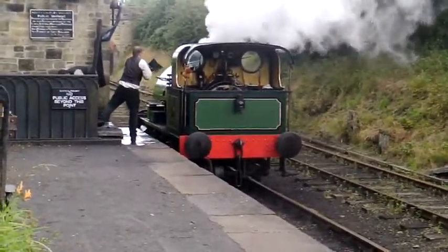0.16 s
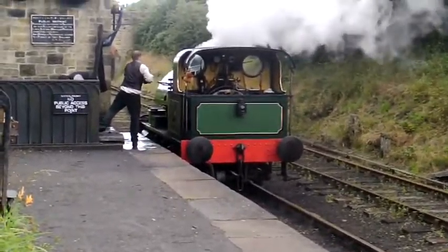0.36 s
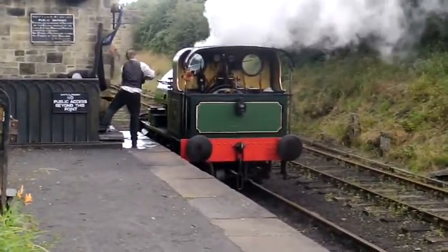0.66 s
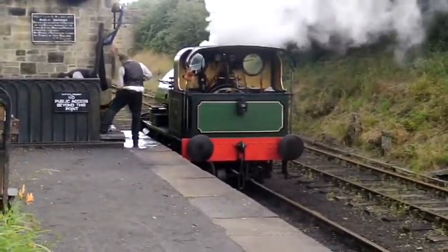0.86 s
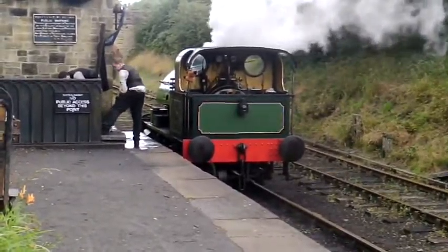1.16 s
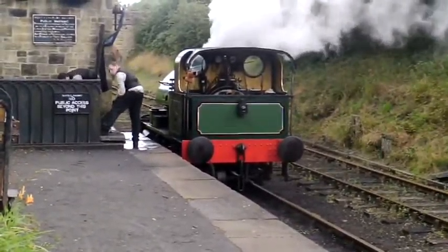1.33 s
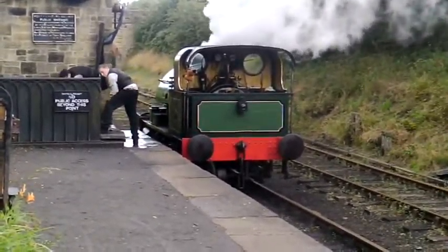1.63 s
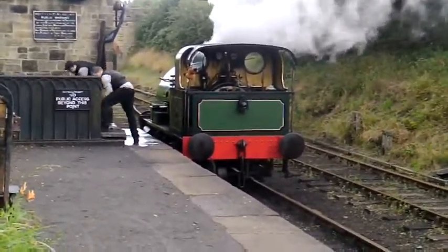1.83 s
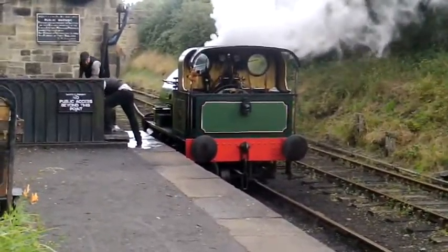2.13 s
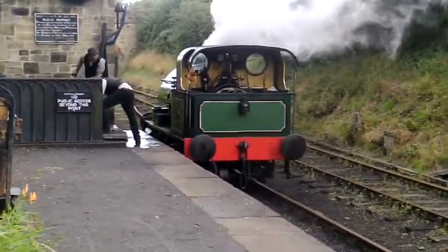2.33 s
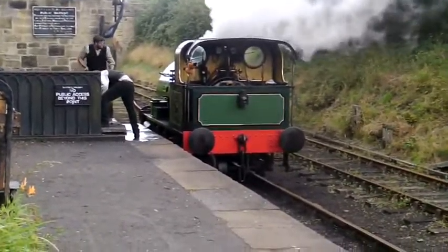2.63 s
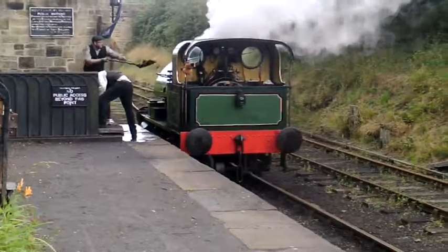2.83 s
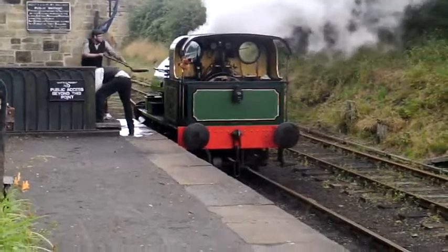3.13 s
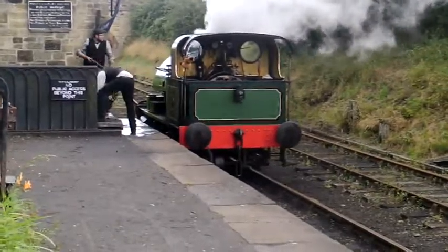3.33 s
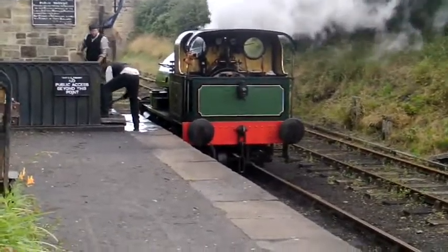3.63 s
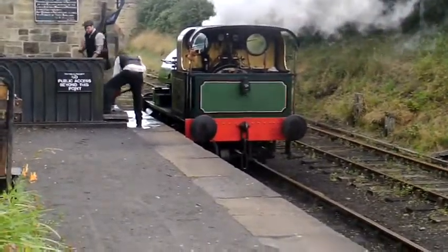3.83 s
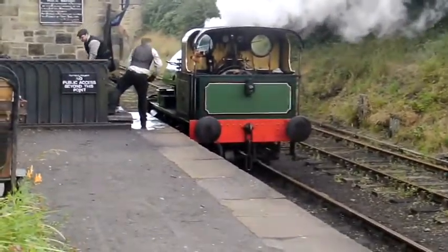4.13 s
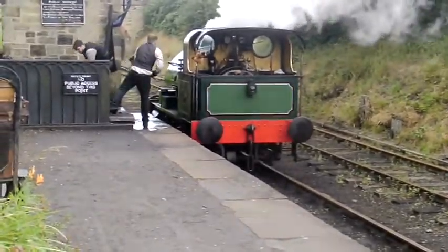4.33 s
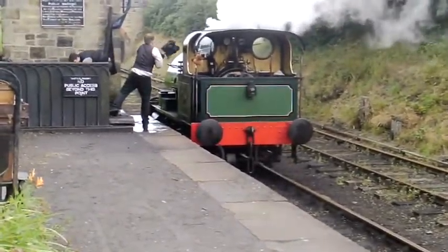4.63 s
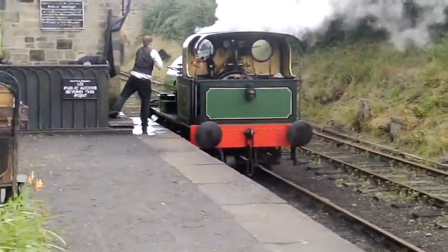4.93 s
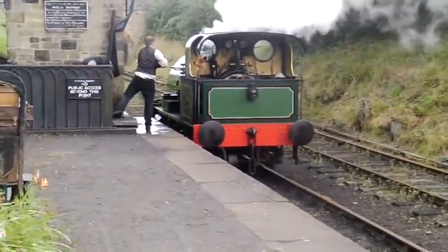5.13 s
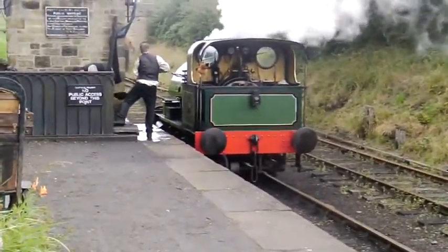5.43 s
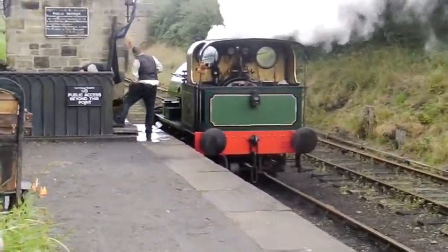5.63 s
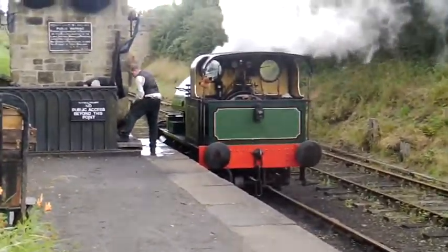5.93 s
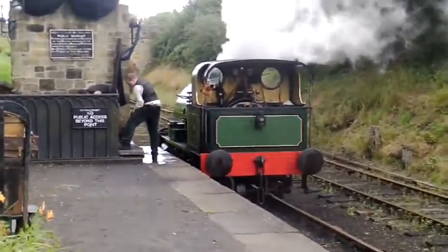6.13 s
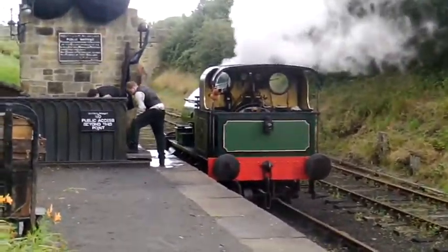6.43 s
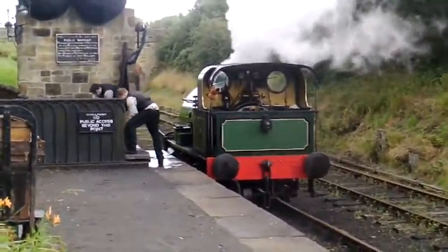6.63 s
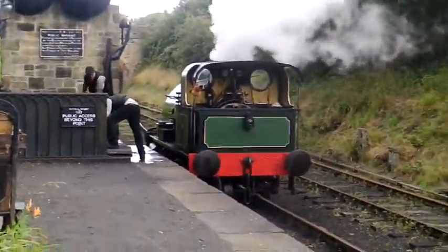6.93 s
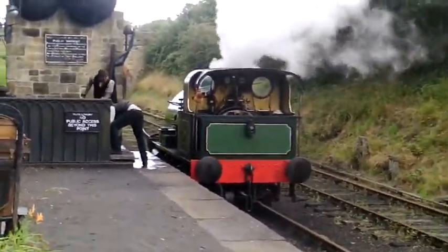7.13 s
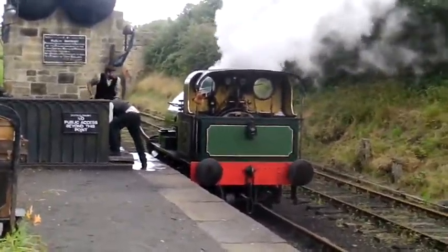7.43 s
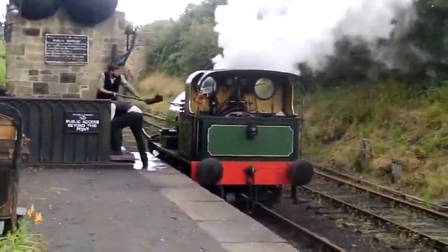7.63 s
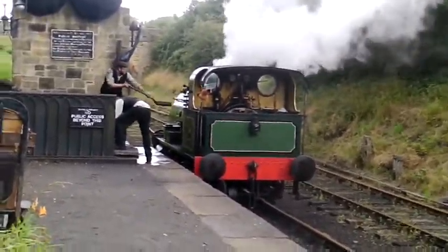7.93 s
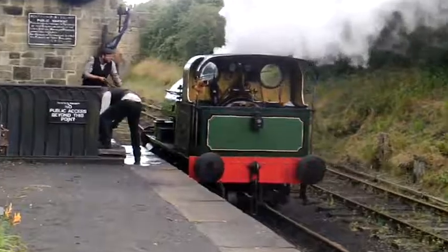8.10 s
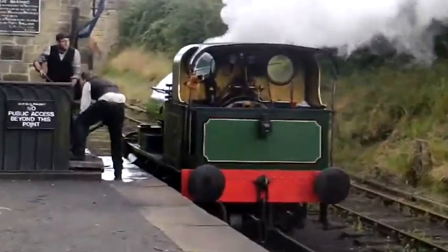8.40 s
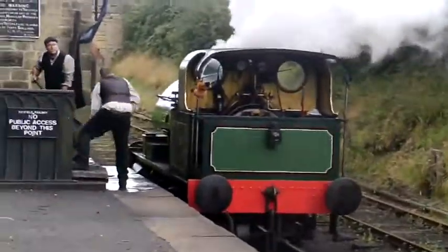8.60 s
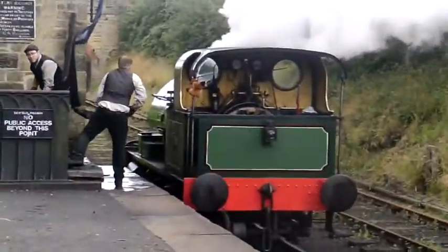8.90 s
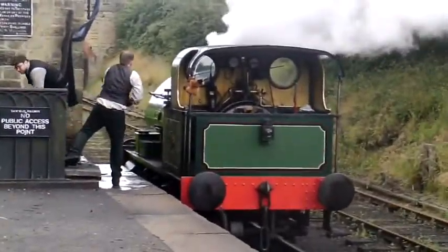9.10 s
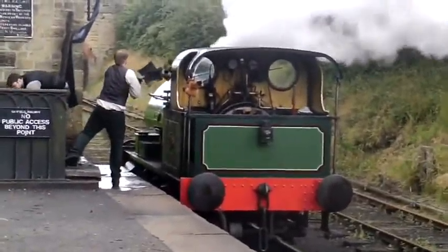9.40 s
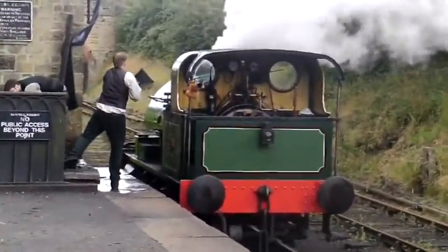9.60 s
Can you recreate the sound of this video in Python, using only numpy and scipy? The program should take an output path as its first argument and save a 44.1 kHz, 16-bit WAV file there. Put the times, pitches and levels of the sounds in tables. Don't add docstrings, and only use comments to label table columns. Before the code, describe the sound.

A loud, steady, piercing steam hiss from a standing locomotive, with wind buffets on the microphone, faint shovel squeaks and coal thuds.

```python
import sys
import numpy as np
from scipy import signal
from scipy.fft import rfft, irfft, next_fast_len
from scipy.io import wavfile
from scipy.ndimage import uniform_filter1d, map_coordinates

SR = 44100
rng = np.random.default_rng(int(sys.argv[2]) if len(sys.argv) > 2 else 0)


def pcm_store(signal):
    levels = np.round(np.clip(np.atleast_2d(signal), -1, 1) * 32767)
    wavfile.write(sys.argv[1], SR, levels.astype(np.int16).T)


def invert_db(level):
    return 10 ** (np.asarray(level, dtype=float) / 20)


N = 430416

# time_s, level_db, pitch_hz
STEAM_JET = [(0, -10.5, 8300), (.48, -11.5, 8200), (.7, -11, 8180), (1.6, -11, 8160), (1.95, -11.5, 8300),
             (3.1, -10.5, 8330), (4.0, -11.5, 8310), (4.15, -12, 8320), (4.5, -11, 8300), (5.03, -11, 8300),
             (5.14, -11.5, 8370), (6.3, -12, 8350), (7.3, -11.5, 8260), (8.4, -11.2, 8300),
             (8.51, -10.5, 8400), (9.25, -11, 8330), (9.38, -13, 8220), (9.5, -10.5, 8130)]
# frequency_hz, level_db (per Hz)
HISS_COLOUR = [(880, -58), (1500, -17), (2090, -10), (2260, -12.5), (3130, -3), (3410, -4.5), (5050, -0.5),
               (7180, -6), (8240, -5.5), (9360, -9), (12300, -18.5), (14500, -26.5), (15600, -35)]
# frequency_hz, level_db (per Hz)
ROAR_COLOUR = [(130, -50), (220, -19.5), (401, -19.5), (569, -13), (1100, -9), (1830, -6), (2270, -7),
               (2600, 1), (3380, -22), (5720, -120)]
# pitch_hz, width_hz, level_db (against the hiss)
PIPE_TONES = [(1195, 17, -60), (2152, 20, -34), (3190, 64, -23), (5050, 140, -17.5), (5620, 24, -22),
              (6400, 88, -36), (7500, 41, -22)]
# start_s, pitch_hz, level_db
PIPE_WHISTLES = [(.15, 4950, -19), (.55, 3190, -23), (.68, 3210, -30), (1.05, 7910, -21), (1.62, 4910, -24),
                 (3.06, 4515, -23), (3.18, 2140, -35), (4.88, 5610, -23), (5.43, 7890, -28),
                 (7.05, 2152, -32), (8.16, 2140, -33), (8.44, 3113, -25), (9.53, 8060, -29)]
# delay_ms, level_db
YARD_ECHOES = [(4.138, -23), (6.67, -26), (9.41, -27), (10.85, -26), (12.4, -28), (13.486, -24),
               (16.25, -30), (19.98, -30), (35.41, -31)]
# time_s, level_db
WIND_GUSTS = [(0, -43), (.6, -44), (1.3, -34), (2.2, -37), (2.7, -35), (3.4, -35.5), (4.3, -38),
              (4.75, -44), (5.4, -41), (6.55, -45), (6.95, -40), (7.3, -41), (7.55, -32), (7.85, -34.5),
              (8.1, -45), (8.96, -42), (9.13, -29), (9.76, -32.5)]
# frequency_hz, level_db (per Hz)
BUFFET_COLOUR = [(7.1, -26), (12, 3.5), (27, -0.5), (39, -0.5), (62, -8), (107, -18), (200, -32),
                 (260, -28), (440, -120)]
# centre_s, level_db
WIND_POPS = [(.919, -18), (1.13, -17), (1.165, -18), (1.669, -19), (2.411, -19), (2.72, -20), (3.368, -23),
             (7.458, -18.5), (7.601, -18), (9.017, -23), (9.069, -12), (9.124, -11), (9.154, -17),
             (9.238, -14), (9.3, -11), (9.358, -20.5), (9.475, -17), (9.537, -18), (9.688, -24),
             (9.714, -17)]
# centre_s, centre_khz
SPLIT_BANDS = [(.251, 14.6), (.46, 5.1), (.46, 6.9), (1.273, 7.0), (1.273, 9.7), (1.366, 7.5), (1.366, 9.7),
               (1.366, 15), (2.294, 14.5), (3.223, 14.8), (3.688, 8.3), (4.152, 14.5), (4.988, 15),
               (5.522, 6.6), (5.684, 15), (6.033, 9.3), (6.033, 15), (6.242, 11.1), (6.242, 13.4),
               (6.59, 11.1), (6.637, 5.7), (6.637, 9), (7.031, 4.9), (7.937, 9), (8.123, 9.7),
               (8.308, 14.5), (8.401, 10), (8.401, 15), (8.819, 14.5), (8.866, 7.9)]
# start_s, level_db, centre_hz
COAL_THUDS = [(.47, -38, 200), (2.046, -33, 650), (3.176, -40, 500), (3.346, -39, 280), (3.597, -41, 352),
              (4.168, -34, 600), (5.052, -34, 240), (5.06, -36, 89.8), (5.085, -33.5, 95), (5.15, -41, 220),
              (5.378, -43, 301), (8.159, -38.5, 141.4), (8.79, -38, 400)]
# start_s, length_s, start_pitch_hz, level_db
SHOVEL_SQUEAKS = [
    (2.3, 0.033, 1118, -28),
    (2.486, 0.047, 1195, -32),
    (6.4, 0.18, 1182, -34),
]
# start_s, length_s (negative gives silence), start_pitch_hz, level_db
BIRD_CHIRP = (2.5, -0.95, 3850, -20.5)

ROAR_DB, ROAR_SWAY_DB = -15.5, .55
SCREECH_DB, SCREECH_HZ, SCREECH_DB_PER_KHZ = -9.5, 8205, 0
WHISTLE_S, WHISTLE_DRIFT = 0.2, 0.0064
FLAP_DB, FLAP_GROWS, CALM_DB = -46, 0.1, -39.5
POP_MS, POP_SPREAD = 5.2, .18
SPLIT_SAMPLES, SPLIT_WIDE_KHZ = 2048, 1.6
THUD_S, THUD_CYCLES = 0.042, 4.5
SQUEAK_SAG_HZ_PER_S, SQUEAK_EDGE = -220, 0.36
CHIRP_RISE_HZ_PER_S, CHIRP_LATE = 2600, 1.9


def unit(x):
    return x / np.sqrt(np.mean(x ** 2) + 1e-20)


def along(points, hz):
    f, v = np.transpose(points)
    return np.interp(np.log(hz + 1), np.log(f + 1), v)


def curves(rows):
    s, *columns = np.transpose(rows)
    return [np.interp(np.arange(N) / SR, s, column) for column in columns]


def wobble(rate):
    coarse = np.arange(0, N + 64, 64)
    values = map_coordinates(rng.standard_normal(N // 100), [coarse * rate / SR])
    return np.interp(np.arange(N), coarse, values)


def filtered(x, response):
    m = next_fast_len(len(x) + 8192)
    spectrum = rfft(x, m) * response(np.fft.rfftfreq(m, 1 / SR))
    return irfft(spectrum, m)[:len(x)]


def coloured(noise, spectrum):
    return unit(filtered(noise, lambda hz: invert_db(along(spectrum, hz))))


def rush(spectrum, patchy_db):
    z = signal.stft(rng.standard_normal(N), nperseg=4096)[2]

    def smooth(bins, frames):
        across_pitch = uniform_filter1d(rng.standard_normal(z.shape), bins, 0)
        return unit(uniform_filter1d(across_pitch, frames, 1))

    patches = 0.73 * smooth(bins=16, frames=5)
    streaks = 1.5 * smooth(bins=3, frames=24)
    noise = signal.istft(z * invert_db(patchy_db * (patches + streaks)), nperseg=4096)[1][:N]
    return coloured(noise, spectrum)


def fuzzy(hz, width_hz):
    knots = np.arange(0, N + 8, 8)
    hold = np.exp(-2 * np.pi * width_hz * knots[1] / SR)
    slow = signal.lfilter([1], [1, -2 * hold, hold ** 2], rng.standard_normal((2, len(knots))))
    sine_part, cosine_part = [np.interp(np.arange(N), knots, v) for v in slow]
    phase = 2 * np.pi * np.cumsum(hz) / SR
    return unit(sine_part * np.sin(phase) + cosine_part * np.cos(phase))


def note(s, length, hz, db, hz_per_s, edge, late):
    t = np.clip(np.arange(N) / SR - s, 0, length)
    arch = np.abs(np.sin(np.pi * (t / length) ** late)) ** edge * (t < length)
    return invert_db(db + 1.5) * arch * np.sin(2 * np.pi * (hz * t + hz_per_s * t ** 2 / 2))


def jet():
    strength_db, screech_hz = curves(STEAM_JET)
    screech_db = SCREECH_DB + SCREECH_DB_PER_KHZ * (screech_hz - SCREECH_HZ) / 1000
    flutter_db = 0.25 * wobble(12) + 0.18 * wobble(4.5)
    hiss = rush(HISS_COLOUR, patchy_db=1.02)
    roar = invert_db(ROAR_DB + ROAR_SWAY_DB * wobble(6.1)) * rush(ROAR_COLOUR, patchy_db=1.22)
    screech = invert_db(screech_db + 1.3 * wobble(14)) * fuzzy(screech_hz + 40 * wobble(6), width_hz=340)
    tones = np.zeros(N)
    for hz, width_hz, db in PIPE_TONES:
        tones += invert_db(db + 1.5 * wobble(4)) * fuzzy(hz * (1 + .004 * wobble(3)), width_hz)
    return invert_db(strength_db + flutter_db - 0.31) * (hiss + roar + screech + tones) + whistles()


def whistles():
    out, rough = np.zeros(N + SR), invert_db(2.1 * wobble(30))
    u = np.linspace(0, 1, round(WHISTLE_S * SR))
    for (s, hz, db), drift in zip(PIPE_WHISTLES, rng.standard_normal(len(PIPE_WHISTLES))):
        pitch_hz = hz * (1 + WHISTLE_DRIFT * drift * (u - .5))
        tone = np.sin(2 * np.pi * np.cumsum(pitch_hz) / SR)
        out[round(s * SR):][:len(u)] += invert_db(db + 2) * np.sin(np.pi * u) * tone
    return out[:N] * rough


def echoes(x):
    def response(hz):
        copies = sum(invert_db(db) * np.exp(-2j * np.pi * hz * ms / 1000) for ms, db in YARD_ECHOES)
        dulling = 0.57 + 0.5 / (1 + (hz / 3000) ** 4)
        return 1 + copies * dulling

    return filtered(x, response)


def wind():
    gust_db, = curves(WIND_GUSTS)
    lump = wobble(11)
    flap_colour = [(60, -10), (100, 3.5), (200, -4.5), (450, -24.5), (700, -60)]  # frequency_hz, level_db
    buffet = unit(invert_db(2.7 * lump) * coloured(rng.standard_normal(N), BUFFET_COLOUR))
    flap = unit(invert_db(1.8 * lump) * coloured(rng.standard_normal(N), flap_colour))
    flap_db = FLAP_DB + FLAP_GROWS * (gust_db - CALM_DB)
    out = invert_db(gust_db + 3.5) * buffet + invert_db(flap_db) * flap
    ms = np.arange(-2000, 2000) / SR * 1000
    for (s, db), (side, size) in zip(WIND_POPS, rng.standard_normal((len(WIND_POPS), 2))):
        width_ms = POP_MS * np.exp(POP_SPREAD * size)
        push = np.exp(-(ms / (0.65 * width_ms)) ** 2)
        rebound = 0.16 * np.exp(-(ms / (2.7 * width_ms)) ** 2)
        span = out[round(s * SR) - 2000:][:len(ms)]
        span += np.sign(side) * invert_db(db - 1.5) * (push - rebound)[:len(span)]
    return out


def split_bands(x):
    out = np.tile(x, (2, 1))
    fade = np.sin(np.pi * np.arange(SPLIT_SAMPLES) / SPLIT_SAMPLES) ** 2
    keep, swap = np.cos(fade * np.pi / 2), np.sin(fade * np.pi / 2)
    for s, centre_khz in SPLIT_BANDS:
        at = round(s * SR) - SPLIT_SAMPLES // 2

        def band(shift):
            piece = np.take(x, np.arange(SPLIT_SAMPLES) + at + shift, mode="wrap")
            return filtered(piece, lambda hz: np.abs(hz / 1000 - centre_khz) < SPLIT_WIDE_KHZ / 2)

        other = np.array([band(SR), band(-SR)])
        out[:, at:at + SPLIT_SAMPLES] += (keep - 1) * band(0) + swap * other
    return out


def shovel():
    squeaks = sum(note(*row, SQUEAK_SAG_HZ_PER_S, SQUEAK_EDGE, late=1) for row in SHOVEL_SQUEAKS)
    out = squeaks * invert_db(.8 * wobble(40))
    t, ragged = np.arange(SR // 4) / SR, invert_db(1.4 * wobble(70))
    for s, db, hz in COAL_THUDS:
        noise = rng.standard_normal(len(t))
        puff = unit(filtered(noise, lambda f: np.exp(-(np.log((f + 1) / hz) / 1.1) ** 2)))
        length_s = THUD_S + THUD_CYCLES / hz
        arch = np.sin(np.pi * np.clip(t / length_s, 0, 1) ** 0.52)
        span = slice(round(s * SR), round(s * SR) + len(t))
        out[span] += invert_db(db) * puff * arch * ragged[span]
    return out


def bird():
    return invert_db(3.2 * wobble(63)) * note(*BIRD_CHIRP, CHIRP_RISE_HZ_PER_S, edge=1.3, late=CHIRP_LATE)


def scene():
    return np.tile(echoes(jet()) + wind() + shovel() + bird(), (2, 1))


def roll_off(x):
    return signal.sosfilt(signal.butter(12, 15720, fs=SR, output="sos"), x)


def record(dry):
    bent = split_bands(dry[0] + .028 * dry[0] ** 2 + .0036)
    clipped = bent / (1 + np.abs(bent / .99) ** 9) ** (1 / 9)
    return roll_off(clipped)


dry = scene()
out = record(dry)
pcm_store(out)
```